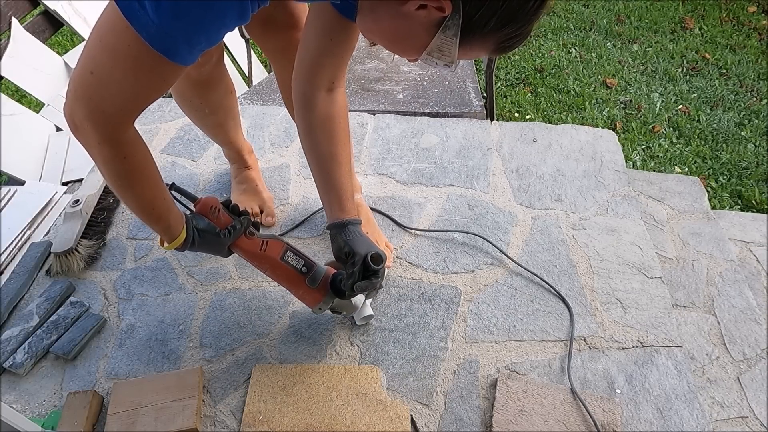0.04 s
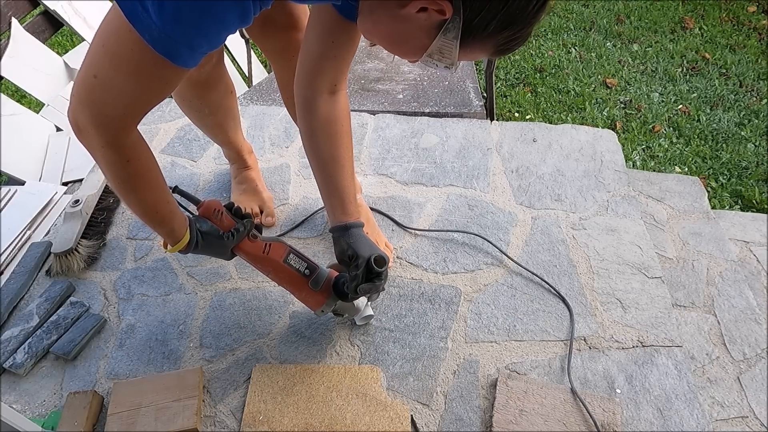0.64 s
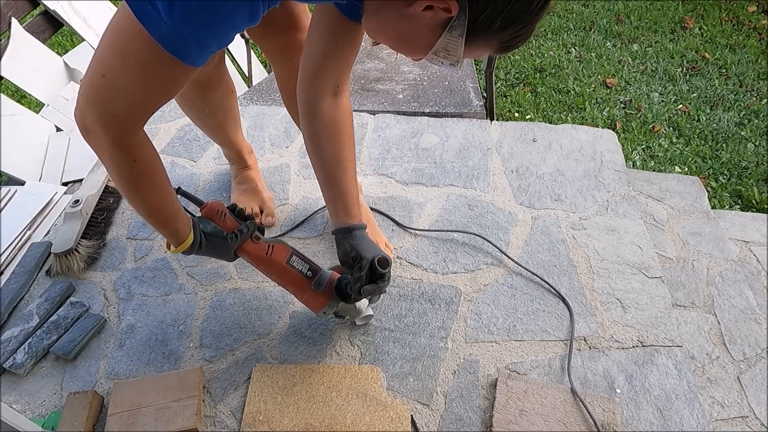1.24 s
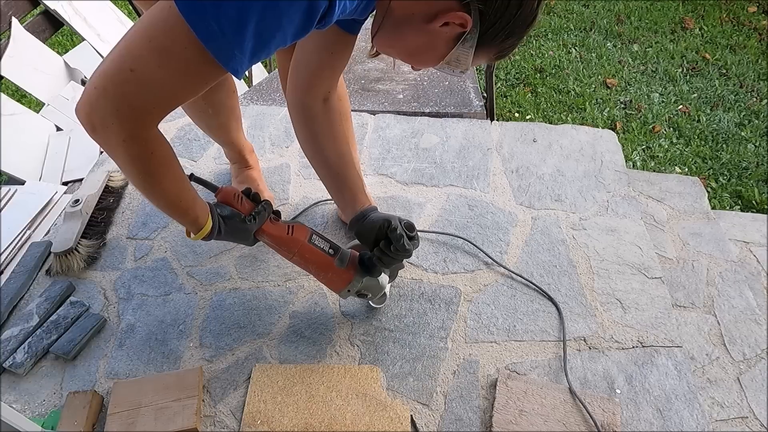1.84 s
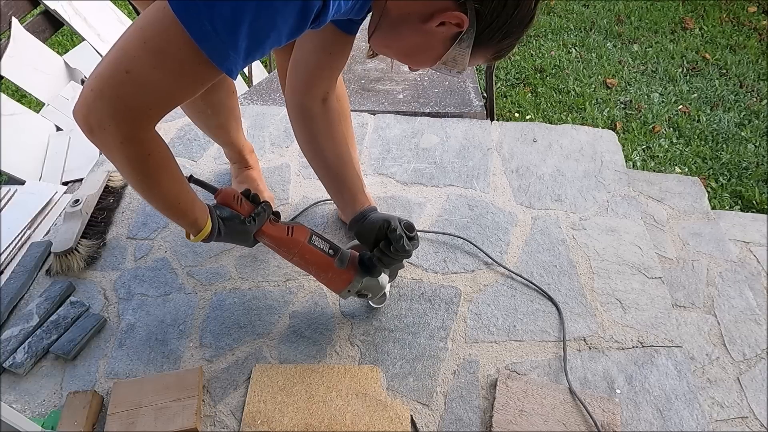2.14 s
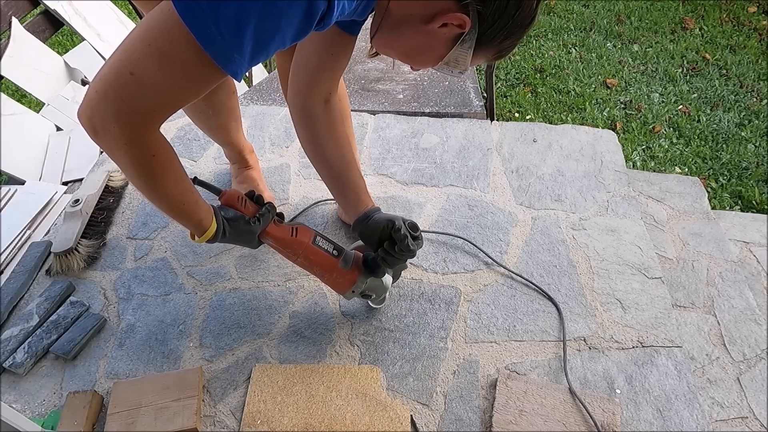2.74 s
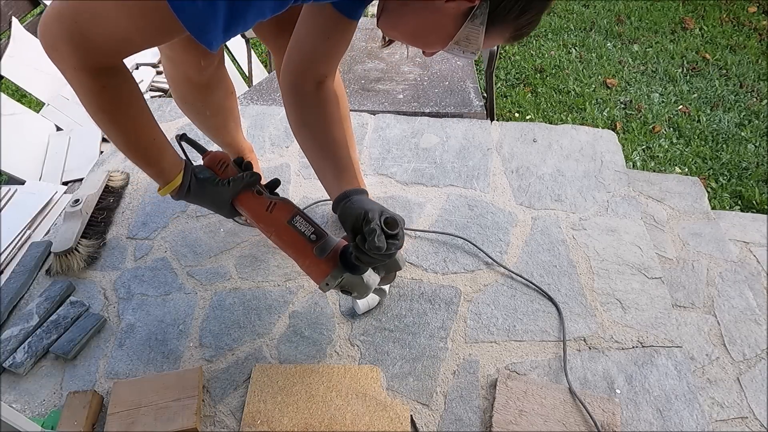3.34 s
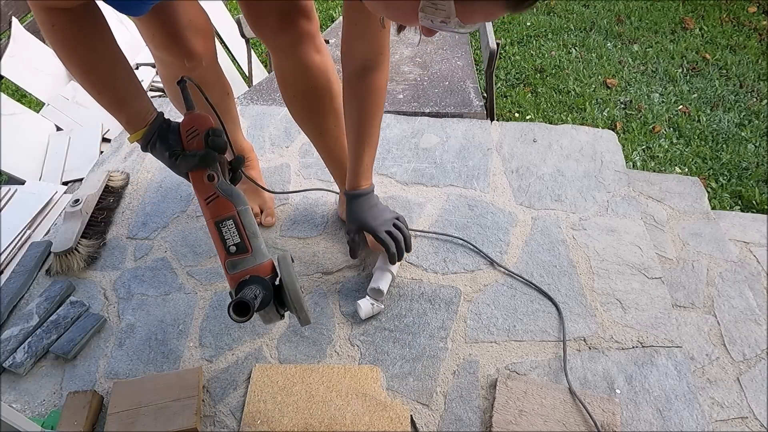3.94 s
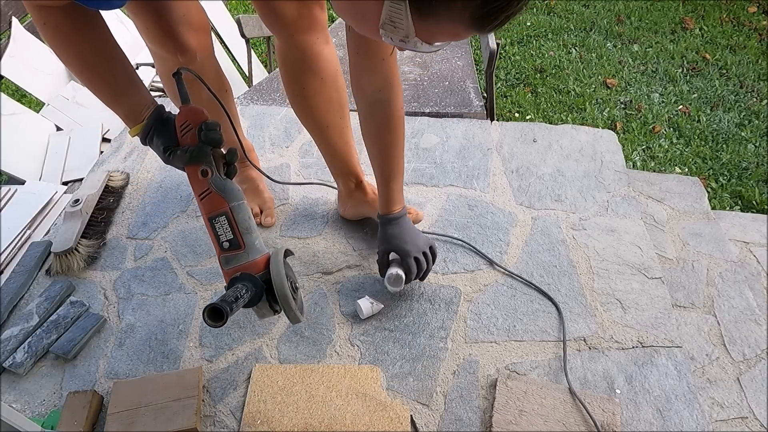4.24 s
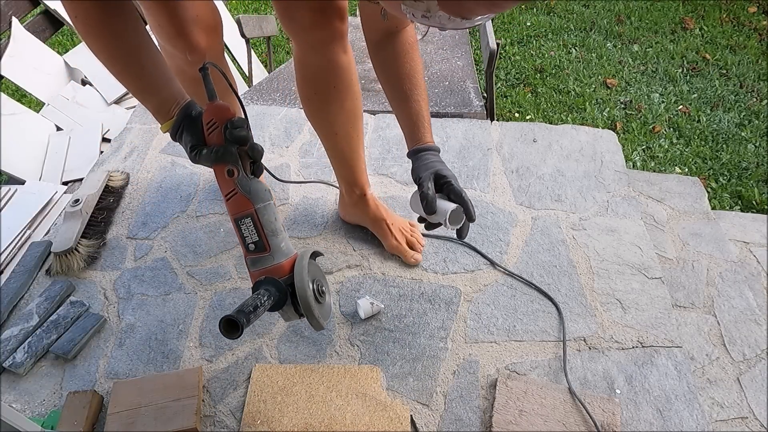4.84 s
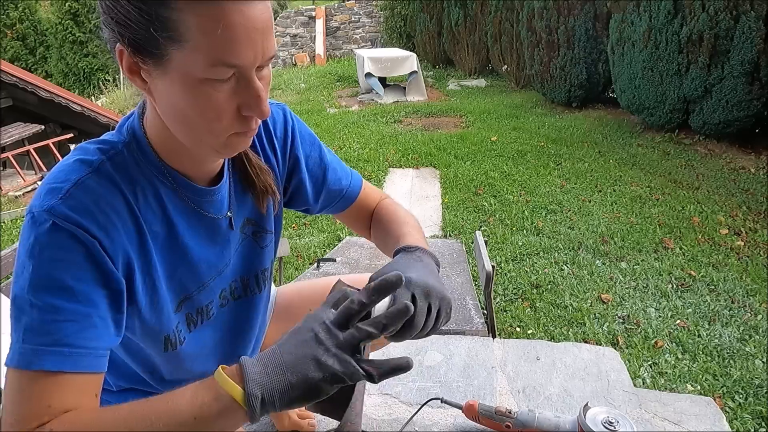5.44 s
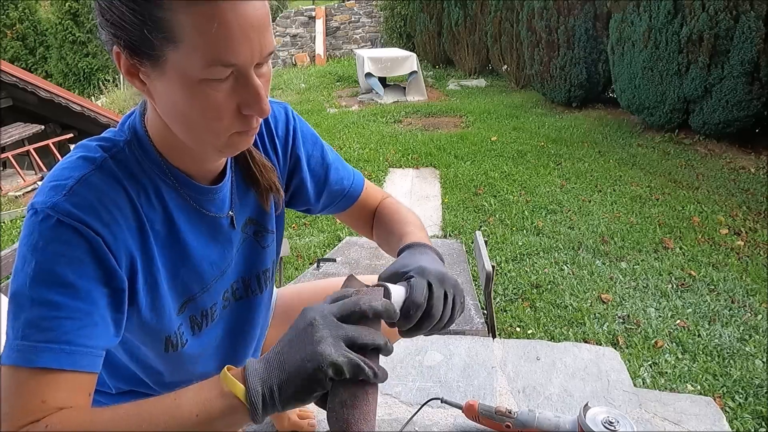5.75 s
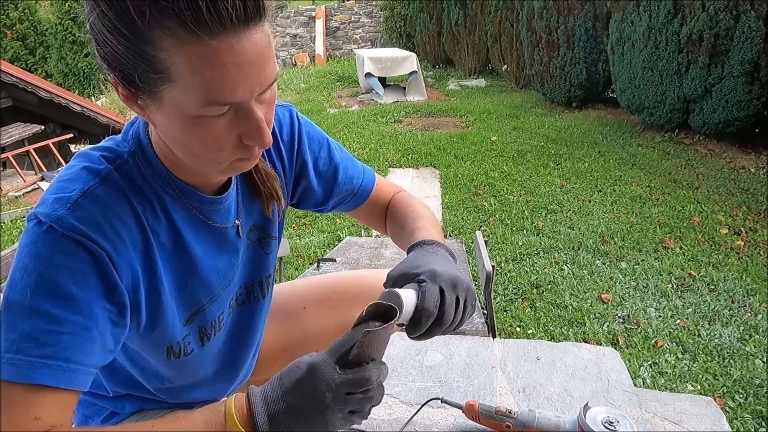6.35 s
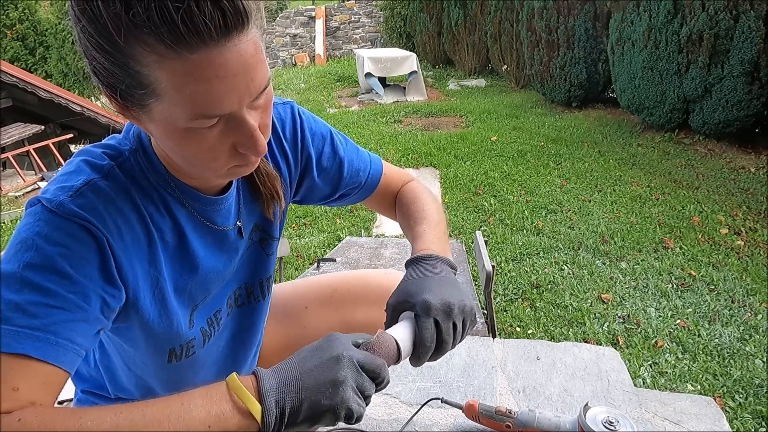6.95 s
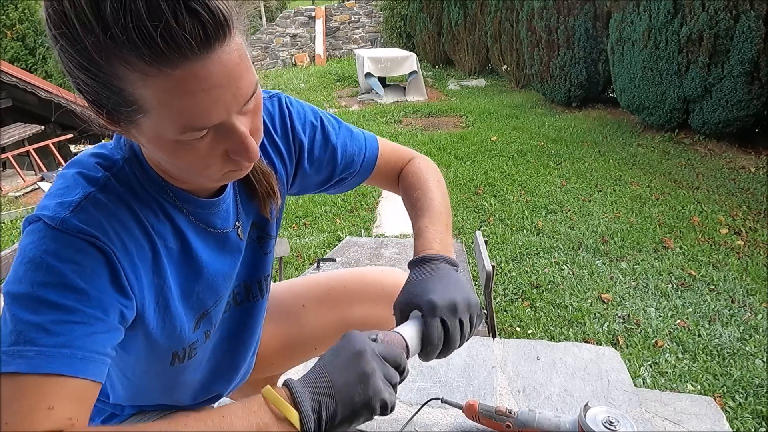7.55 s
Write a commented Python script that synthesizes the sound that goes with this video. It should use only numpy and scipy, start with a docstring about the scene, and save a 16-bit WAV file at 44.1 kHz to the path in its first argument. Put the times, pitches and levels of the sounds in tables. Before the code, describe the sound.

Close by, an angle grinder cuts plastic pipe and coasts down with rattling gears, followed suddenly by soft, scratchy hand sanding.

```python
"""Cutting and sanding a pipe

An angle grinder cuts a small pipe on a stone terrace, close by. Over the rush of fan air and grit,
the disc rings as it bites, is lifted clear and brushes the pipe again. Switched off, the motor falls in
pitch and the loose gears rattle. Then the scene changes suddenly to a quiet garden, where gloved
hands rub the pipe's end with sandpaper: the paper rasps and catches, and the air in the pipe rings."""
import sys
import numpy as np
from scipy import signal
from scipy.fft import rfft, irfft, next_fast_len
from scipy.io import wavfile
from scipy.ndimage import uniform_filter1d

SR = 44100
rng = np.random.default_rng(int(sys.argv[2]) if len(sys.argv) > 2 else 0)


def materialize(psi):
    """Save the field psi as 16-bit PCM at rate SR to the path in sys.argv[1].

    A 1-D psi becomes a single channel; in a 2-D psi each row is a channel.
    """
    bounded = np.clip(np.atleast_2d(psi).T, -1, 1)
    quanta = np.round(bounded * 32767).astype(np.int16)
    wavfile.write(sys.argv[1], SR, quanta)


N = 334719
TIME = np.arange(N) / SR
FFT_SIZE = next_fast_len(N, real=True)
HZ = np.fft.rfftfreq(FFT_SIZE, 1 / SR)

LIFT_S = 1.794  # the disc is lifted clear of the pipe
OFF_S, SANDING_S = 3.31, 5.495  # switch-off, sanding begins
GEAR_RATIO = 34 / 9  # motor turns for one turn of the disc

# Disc speed under power; the load slows it (time [s], speed [turns/s])
DISC_SPEED = [(0, 151.44), (0.55, 150.52), (0.9, 148.92), (1.45, 147.04), (1.68, 147.5), (1.97, 152.58),
              (2.55, 157.5), (2.98, 155), (3.31, 156.75)]
# The disc touches the pipe (start [s], end [s], contact level [dB], hiss of flying grit [dB])
BITES = [(0, .28, 0.5, -39.5), (0.3, 1.737, -1, -50.5), (1.93, 1.982, -1, -41.5), (2.42, 2.46, 0, -42.5),
         (2.516, 2.874, -0.5, -46.5), (2.898, 2.97, 1, -39)]
# Pitches at which disc and guard like to ring (pitch [Hz], width [Hz], level [dB])
DISC_RESONANCES = [(906, 48, -43), (1100, 56, -41), (1780, 110, -38), (2800, 200, -42), (3570, 200, -40),
                   (4920, 260, -30), (4650, 100, -38), (5580, 150, -41), (5850, 160, -36), (6780, 120, -45),
                   (7240, 150, -39), (7520, 120, -51), (8130, 120, -52), (8450, 120, -51), (9080, 220, -50),
                   (10450, 150, -50), (14000, 200, -54)]
# The disc's harmonics (multiples of its speed) between those resonances (pitch [Hz], level [dB])
DISC_BASE = [(150, -58.5), (450, -60.5), (750, -46), (2400, -59), (4000, -41.5), (5500, -46), (6800, -48),
             (8000, -56), (10500, -67.5), (13000, -56), (15000, -75)]
# The disc squeals on one harmonic (peak time [s], length [s], multiple of disc speed, level [dB])
SQUEALS = [(.03, 0.17, 32, -25), (.03, .1, 51, -33), (.04, .2, 12, -39), (0.046, 0.093, 45, -30),
           (.08, 0.25, 33, -27), (.1, 0.22, 54, -48), (.15, 0.28, 57, -41), (.2, 0.25, 61, -36),
           (.22, 0.11, 62, -45), (.25, 0.22, 48, -32.5), (.26, 0.14, 45, -35), (.3, 0.24, 37, -32),
           (.3, 0.43, 6, -41.5), (.33, 0.14, 32, -28), (.15, 0.25, 29, -37), (.15, 0.29, 36, -35),
           (.4, .25, 33, -43), (.45, .2, 54, -50), (.55, .25, 50, -59), (.85, 0.17, 34, -33),
           (1.15, .1, 61, -45), (.45, .3, 39, -38), (.58, .15, 38, -31), (.66, 0.31, 32, -32.5),
           (.68, 0.34, 33, -31.5), (.68, 0.17, 45, -38.5), (.71, 0.14, 48, -35), (0.717, 0.16, 39, -28.5),
           (.72, 0.26, 70, -44.5), (.75, 0.77, 24, -36.5), (.8, 0.56, 20, -40), (.82, .15, 94, -42),
           (.85, 0.15, 8, -34.5), (.88, 0.2, 9, -38.5), (0.962, 0.12, 32, -27.5), (0.974, 0.29, 12, -35),
           (.99, .09, 49, -35.5), (1.0, .09, 40, -29.5), (1.0, .12, 92, -47), (1.067, .1, 34, -38),
           (1.07, 0.25, 38, -36), (1.094, 0.081, 33, -28.5), (1.15, 0.17, 57, -47.5),
           (1.15, 0.23, 49, -35.5), (1.22, .14, 40, -35.5), (1.17, 0.21, 32, -28.5),
           (1.24, 0.25, 19, -31.5), (1.32, 0.19, 33, -28.5), (1.32, .2, 34, -36), (1.35, 0.26, 8, -36),
           (1.35, .14, 18, -35), (1.38, 0.14, 40, -30), (1.4, 0.3, 32, -35), (1.443, 0.26, 49, -33.5),
           (1.57, 0.24, 12, -42), (1.58, 0.17, 18, -33), (1.574, 0.068, 40, -30), (2.898, 0.16, 35, -32.5),
           (2.946, .1, 33, -39)]
# Quick tremble of the harmonics, roughest at the top (pitch [Hz], share of the level [0-1])
TREMBLE = [(5000, .2), (7000, .4), (14000, .55)]

# Tone of the rush deep in the cut, running free, coasting and at its slowest
# (frequency [Hz], level [dB per Hz])
RUSH_BITING = [(35, -59), (60, -25), (480, -14), (564, -4), (679, -8.5), (875, -4.5), (1420, -5),
               (2310, -1.5), (4210, -7), (4950, 2), (5330, -5.5), (5700, -2), (6150, -9), (6700, -11.5),
               (7330, -13.5), (7800, -19), (9000, -31.5), (9900, -30.5), (11400, -32.5), (12800, -30),
               (14000, -36), (15000, -48)]
RUSH_FREE = [(35, -63), (60, -29.5), (317, -16.5), (418, -20), (591, -8), (648, -11.5), (762, -7.5),
             (855, -7), (2360, 0), (2780, -3.5), (4950, -3), (6380, -6.5), (8420, -14.5), (11900, -21),
             (15000, -46)]
RUSH_COASTING = [(40, -55), (95, -66), (150, -18), (260, -20), (430, -14), (680, -8), (880, -10),
                 (1150, -2.5), (1500, -7.5), (2050, 0.5), (3700, -2.5), (4900, -1), (5800, -8), (6600, -6),
                 (7700, -10), (8600, -17.5), (12200, -26), (14000, -41), (15000, -51)]
RUSH_SLOW = [(40, -53.5), (95, -42), (150, -20.5), (400, -15), (680, -5), (1500, -6.5), (2300, 3),
             (3500, -2), (4400, 4), (5400, -3), (7300, -9.5), (8600, -23.5), (12500, -32), (15000, -51)]
# The blend of those four tones (time [s], stage [0 biting, 1 free, 2 coasting, 3 slowest])
RUSH_STAGE = [(0, 0), (1.74, .12), (1.81, 1), (3.5, 1), (3.9, 2), (4.7, 2.1), (5.15, 3)]
# Resonances of the housing, and those the knocking gear head adds (pitch [Hz], width [Hz], lift [dB])
HOUSING_RESONANCES = [(330, 70, 2), (910, 90, 2), (1780, 130, 2), (2330, 250, 1.5), (3050, 200, 1.5),
                      (3600, 220, 2), (4150, 200, 1.5), (6350, 400, 1.5)]
GEAR_HEAD_RESONANCES = [(3120, 170, 1.5), (3400, 300, 0), (4050, 420, 3), (4660, 230, -1)]
# How much of the rush comes in knocks of the loose gears (time [s], share [0-1])
KNOCK_SHARE = [(0, 0.38), (3.3, 0), (3.8, 0.76), (4.6, 0.52), (5.1, 0.79), (5.5, 0.58)]
# The knocks sound mainly in the upper middle range (frequency [Hz], depth [0-1])
KNOCK_BAND = [(700, 0.3), (2000, 0.8), (6000, 1), (9000, 0.2)]
# At low speed the hardest knocks stand apart as clacks (time [s], relative level [dB])
CLACKS = [(5.078, 0.5), (5.089, 1.5), (5.101, 1), (5.113, -1), (5.124, 2), (5.158, 3.5), (5.176, 4.5),
          (5.184, 4), (5.201, -1), (5.211, 4), (5.219, 4), (5.226, -1), (5.238, 4), (5.2533, 4),
          (5.2714, 1), (5.3057, 4), (5.33, 1.5), (5.340, 1.5), (5.352, 3), (5.369, 0), (5.384, 3.5),
          (5.397, 5.5), (5.413, 1), (5.424, 3.5), (5.4433, 1.5), (5.471, -0.5), (5.481, -1.5)]

# The steel guard's two close resonances (pitch [Hz], width [Hz], relative level [dB])
GUARD_RESONANCES = [(4943, 160, 0), (5105, 150, -2)]
# The guard chatters loudly (time [s], length [s], pitch [Hz], bend [Hz/s], level [dB])
CHATTERS = [(3.365, .022, 5100, -3000, -26.5), (3.473, 0.046, 5100, -1800, -27), (3.44, .05, 3620, 0, -29),
            (3.72, .14, 5060, 1100, -26), (3.68, 0.055, 3800, -500, -30.5), (3.81, .06, 3740, 601, -32),
            (4.4, 0.032, 5020, 0, -29), (4.68, 0.18, 5300, 0, -30.5), (5.43, .06, 5000, 0, -25)]
# The hum swells as it passes through these bands of the housing (pitch [Hz], width [Hz], level [dB])
HUM_BANDS = [(320.7, 16, -35), (348.4, 55, -35), (408.5, 14, -38.5), (452, 55, -41.5), (548, 64, -40),
             (599.6, 34, -42.5)]
# Motor whines; multiple 9 is the gear teeth meeting
# (multiple of motor speed, level under power [dB], level coasting [dB])
WHINES = [(3, -46.5, -47.5), (4, -39.5, -51.5), (7, -53, -54.5), (8, -41, -49), (9, -55, -39.5),
          (10, -60, -50), (12, -43, -61)]
# Bands in which the gear head lifts a whine (pitch [Hz], width [Hz], lift [dB])
WHINE_BANDS = [(1180, 160, 6.5), (3150, 280, 0)]
# A falling whine sings out in the gear head (time [s], length [s], multiple of motor speed, level [dB])
WHINE_SWELLS = [(3.85, .06, 9, -33), (4.21, .07, 9, -29.5), (4.35, .06, 9, -33.5), (4.33, .06, 10, -35),
                (4.8, 0.11, 8, -35.5), (5.15, 0.17, 9, -36.5), (5.27, .07, 7, -33.5), (5.45, 0.083, 8, -34)]

# Sandpaper strokes; the pipe answers with a hollow note when the hand uncovers it
# (peak time [s], level [dB], rise [s], fall [s], relative hollow note [dB])
STROKES = [(5.5, -46.5, 0.023, 0.17, -9.5), (5.82, -53, 0.04, 0.062, -6), (5.99, -45, 0.031, 0.056, -7),
           (6.07, -49, .025, 0.1, -7), (6.33, -61.5, 0.035, 0.048, 7.5), (6.62, -57.5, 0.036, 0.11, -4),
           (6.74, -64, .03, .05, -2), (6.82, -37, 0.03, 0.15, -8), (6.93, -46, 0.018, 0.046, -1),
           (7.01, -39, 0.024, 0.022, -6), (7.115, -41.5, 0.009, 0.039, -7), (7.18, -43, 0.011, 0.023, -10),
           (7.255, -39.5, 0.073, 0.06, -11), (7.35, -33, 0.077, 0.034, -5), (7.54, -31, 0.064, 0.41, -8)]
# Tone of firm rubbing, catching paper, glove bumps and light rubbing (frequency [Hz], level [dB per Hz])
FIRM_TONE = [(59, -75), (100, -47), (222, -22), (310, -28), (434, -15.5), (703, -4), (1020, 4.5),
             (1160, -11), (1350, -4), (1900, -0.5), (2400, -5.5), (3250, -10.5), (6760, -20.5),
             (15000, -47)]
CATCH_TONE = [(100, -49), (250, -21), (600, -10), (950, -1.5), (1350, 7), (1800, -8.5), (2700, -16),
              (3300, -13), (4200, -12.5), (6000, -18.5), (8500, -29.5), (12000, -37), (15000, -45)]
BUMP_TONE = [(40, -31), (100, -12), (200, 5), (370, 6), (600, 5), (1200, -47), (4000, -70)]
LIGHT_TONE = [(100, -10.5), (300, 6.5), (650, -0.5), (1200, 7.5), (1800, 3.0), (2600, 1), (4800, -5.0),
              (7500, -18.5), (9500, -27.5), (13000, -30), (15000, -33)]
# The rim catches on the paper (time [s], level [dB], length [s], relative rasp [dB], relative ring [dB])
CATCHES = [(5.562, -42.5, 0.014, -23, -7), (5.627, -45, 0.0083, -23, -3), (5.785, -41, 0.0066, -20, -4),
           (5.931, -46, 0.0018, -4, -15), (5.962, -38.5, 0.0043, -20, 5.5), (6.3, -38, 0.004, -14, -6),
           (6.451, -57, .003, -1, -15), (6.499, -51, 0.0022, -1, -15), (6.6, -42, 0.0075, -11, -13),
           (6.687, -50.5, .011, -4, -3), (6.786, -33, 0.0047, -6, 2), (6.793, -32.5, 0.006, 1, -3),
           (6.8, -33, 0.0034, 0, -8), (6.833, -25.5, 0.013, 0, -12), (6.902, -34, 0.0067, -0.5, 0),
           (7.091, -35.5, 0.007, -20, 2), (7.128, -39, .004, -15, -12), (7.1525, -23.5, 0.0068, -15, -7),
           (7.177, -31, 0.0044, -15, -5), (7.192, -25, 0.012, -13, -14), (7.226, -27, 0.007, -16, -9),
           (7.309, -30, .003, -10, -6), (7.321, -33, .002, 0, -10), (7.331, -33, .002, -2, -8),
           (7.343, -32, 0.0016, 3, -10), (7.349, -36, .002, 0, -10), (7.362, -33, 0.0024, -8, 1),
           (7.454, -33, 0.004, -18, -7), (7.461, -34, .003, -16, -12), (7.523, -34, 0.0018, 12, -14)]
# Gloves bump the pipe (time [s], level [dB])
BUMPS = [(5.785, -53), (6.483, -61), (6.687, -54), (6.788, -39), (6.83, -33.5), (6.902, -44), (7.091, -50)]
# The lowest note of the air in the pipe shifts as the hand covers its end (time [s], pitch [Hz])
PIPE_NOTE = [(5.55, 1420), (5.8, 1174), (6.07, 1230), (6.3, 1300), (6.62, 1320), (6.85, 1380), (7.54, 1340)]
# Higher resonances of that air (pitch [Hz], width [Hz], gain [dB])
PIPE_RESONANCES = [(2490, 280, -18), (4000, 300, 8.5)]

# Gusts of air hit the microphone (time [s], length [s], level [dB])
GUSTS = [(.13, 0.15, -47), (1.79, 0.037, -67), (2.94, 0.073, -59)]
# Tone of the still garden and of the buffeting air (frequency [Hz], level [dB per Hz])
GARDEN_TONE = [(30, -3.5), (95, -28), (145, 10), (260, 7.5), (450, -16), (800, -22), (1400, -5), (4000, -6),
               (8000, -19.5), (15000, -34)]
BUFFET_TONE = [(15, -4.5), (50, -3.5), (150, -2.5), (300, -12), (1000, -79.5)]
# Stereo width, narrow in the first cut and the light rubbing (start [s], side gain [dB])
STEREO_WIDTH = [(0, -7.5), (1.79, 1), (5.5, -18), (6.78, -4)]
# How alike left and right are (frequency [Hz], likeness [1 or more means alike])
LIKENESS = [(60, 1), (130, 0.9), (300, 0.85), (1400, 0.93), (3000, 0.82), (6000, 1), (9000, 8), (14000, 5)]
# Balance between the sides (frequency [Hz], left minus right [dB])
BALANCE = [(100, -1.9), (400, 0.5), (5000, -0.5), (8000, 1.5), (11000, -0.5), (13500, -4)]
# While the sound is narrow, the top treble still spreads sideways (frequency [Hz], side gain [dB])
TOP_SPREAD = [(5000, -44.5), (8000, -20), (10500, -5), (13000, 9.5)]


def disc(turns, wander_db=2.0, level_db=-1, ring_db=-1.0, squeal_db=1, brush_db_per_harmonic=-0.03):
    """The disc strikes the pipe alike on every turn; its harmonics swell as they cross a resonance."""
    n = int(3.2 * SR)  # the last bite has faded by then
    t = TIME[:n:200]
    turns_per_s, pressed, out = speed(t), contact(t), np.zeros(n)
    first_harmonic, wave = np.exp(2j * np.pi * turns[:n]), 1
    for k in range(1, 99):
        hz, wave = k * turns_per_s, wave * first_harmonic
        power = gain_of(at_hz(DISC_BASE, hz)) ** 2
        power += sum((gain_of(db + ring_db) * peak(hz, f, w)) ** 2 for f, w, db in DISC_RESONANCES)
        # the contact point creeps along the slot, so each harmonic grows and fades
        slow, quick = rng.standard_normal((2, len(t)))
        slow = unit_level(uniform_filter1d(uniform_filter1d(slow, size=50), size=30))
        level = np.sqrt(power) * pressed * gain_of(wander_db * slow + level_db)
        # once lifted clear, light brushes stir the high harmonics less
        level *= gain_of(brush_db_per_harmonic * k * (t > LIFT_S))
        for s, length, multiple, db in SQUEALS:
            if multiple == k:
                level = np.maximum(level, gain_of(db + squeal_db) * swell(s, length, t) ** 2)
        level *= 1 + at_hz(TREMBLE, hz) * unit_level(uniform_filter1d(quick, size=3))
        # harmonics near the guard's main ring swing in step, so the screech throbs once a turn
        lag = rng.random() * (abs(k * turns_per_s[0] - GUARD_RESONANCES[0][0]) > 330)
        out += np.interp(TIME[:n], t, level) * (wave * np.exp(2j * np.pi * lag)).real
    return np.sqrt(2) * np.pad(out, (0, N - n))


def contact(t=TIME, column=2, press_s=0.0084, release_s=0.062):
    """Each bite presses in, holds and lets go. Column 2 gives the contact's gain, 3 the grit's."""
    bites = []
    for row in BITES:
        before, after = np.maximum(row[0] - t, 0), np.maximum(t - row[1], 0)
        bites.append(gain_of(row[column]) * np.exp(-before / press_s - after / release_s))
    return np.max(bites, axis=0)


def speed(t=TIME):
    """Turns of the disc per second."""
    return over_time(DISC_SPEED, t) / 2 ** slowing(t)


def slowing(t=TIME, coast_s=3.37, drag_share=.0142, drag_s=.35):
    """Octaves (halvings) of speed lost since the switch-off; air drag takes a little extra at first."""
    since = np.maximum(t - OFF_S, 0)
    return (since / coast_s + drag_share * (1 - np.exp(-since / drag_s))) / np.log(2)


def rush(knocks, flutter_db=.5, patchy_db=1.6):
    """Fan air, grit and gear knocks make noise in the housing; its tone follows load and speed."""
    frames = dict(nperseg=1024, noverlap=768)
    hz, t, (steady, knocked) = signal.stft(white() * [np.ones(N), knocks], SR, **frames)
    noise = steady + at_hz(KNOCK_BAND, hz)[:, None] * (knocked - steady)
    stage = over_time(RUSH_STAGE, t)
    tone_db = sum(at_hz(tone, hz)[:, None] * np.maximum(1 - abs(stage - k), 0)
                  for k, tone in enumerate((RUSH_BITING, RUSH_FREE, RUSH_COASTING, RUSH_SLOW)))
    tone_db += lift_db(HOUSING_RESONANCES, hz)[:, None]
    tone_db += lift_db(GEAR_HEAD_RESONANCES, hz)[:, None] * np.clip(stage - 1, 0, 1)
    # narrow bands come and go as the tool moves over the stone
    patches = uniform_filter1d(rng.standard_normal(noise.shape), size=4, axis=0)
    tone_db += patchy_db * unit_level(uniform_filter1d(patches, size=18, axis=1))
    sound = signal.istft(noise * rush_levels(gain_of(tone_db), hz, t), **frames)[1][:N]
    return sound * gain_of(flutter_db * drift(30))


def rush_levels(tone, hz, t, free_db=-21.5, deep_db=-5.5, hiss_db=-43):
    """The rush grows until the disc is lifted and fades as it coasts; flying grit adds hiss on top."""
    cut_time_left = np.maximum(1 - t / LIFT_S, 0)  # as a share, from 1 down to 0
    body_level = gain_of(free_db + deep_db * np.sqrt(cut_time_left) - 2.5 * slowing(t))
    hiss = gain_of(hiss_db - 0.5 * (t < LIFT_S) - 9 * slowing(t) ** 2)
    top_level = np.hypot(hiss, contact(t, column=3))
    body, top = (hz > 1200) & (hz < 4300), (hz > 8500) & (hz < 13000)
    body_gain = body_level / np.sqrt((tone[body] ** 2).sum(0) / len(hz))
    top_gain = top_level / np.sqrt((tone[top] ** 2).sum(0) / len(hz))
    high = np.interp(hz, [7000, 8800], [0, 1])[:, None]
    return tone * body_gain ** (1 - high) * top_gain ** high


def gear_rattle(turns, skip_below=0.12, jitter_turns=.07, spread_db=0.9, between_db=-12, ring_s=.0036):
    """Loose gear teeth knock about once a turn, at last in separate clacks: gives a loudness pattern."""
    turn = np.arange(int(turns[-1]))
    late, size, luck = rng.standard_normal((1500, 3))[:len(turn)].T
    at = np.interp(turn + jitter_turns * late, turns, np.arange(N)).astype(int)
    knock_db = spread_db * size + between_db * (TIME[at] > CLACKS[0][0])
    knocks = np.zeros(N)
    knocks[at] = gain_of(knock_db) ** 2 * (abs(luck) > skip_below)
    for s, db in CLACKS:
        knocks[round(s * SR)] += gain_of(db) ** 2
    t = TIME[:SR // 30]
    power = np.maximum(signal.oaconvolve(knocks, t * np.exp(-2 * t / ring_s))[:N], 0)
    power /= uniform_filter1d(power, SR // 8) + 1e-12
    share = over_time(KNOCK_SHARE)
    return np.sqrt(1 - share + share * power)


def guard(turns, knocks, cut_db=-35.5, coast_db=-31.5, throb=0.35, brush_db=-9, chatter_width_hz=130):
    """The steel guard rings and chatters, shaken once a turn in the cut and by the gears afterwards."""
    cutting = gain_of(cut_db + brush_db * (TIME > LIFT_S)) * contact()
    cutting *= 1 + throb * np.cos(2 * np.pi * turns)
    coasting = gain_of(coast_db) * np.clip((TIME - OFF_S) * 10, 0, 1)
    ring = sum(gain_of(db) * resonate_twice(white() * knocks, hz, width)
               for hz, width, db in GUARD_RESONANCES)
    out = (cutting + coasting) * unit_level(ring)
    shaking = white() * knocks
    for s, length, hz, bend, db in CHATTERS:
        near = abs(TIME - s) < 2 * length
        t = TIME[near]
        chatter = glide(shaking[near], hz + bend * (t - s), chatter_width_hz)
        out[near] += gain_of(db) * swell(s, length, t) * unit_level(chatter)
    return out


def motor(turns, rough=0.13, coast_rough=0.06, wobble=0.023, labour_db=4.5, labour_s=.08, bars_db=-55):
    """The motor hums at its own speed, roughly under power and more cleanly when coasting."""
    shaft = 2 * np.pi * GEAR_RATIO * turns + wobble * drift(25)
    coasting = np.clip(TIME - OFF_S, 0, 1)
    unrest = rough + (coast_rough - rough) * coasting
    hum = np.sin(shaft) * (1 + unrest * drift(35)) + np.cos(shaft) * unrest * drift(35)
    hum /= np.sqrt(1 + 2 * unrest ** 2)
    hz = GEAR_RATIO * speed()
    hum *= np.sqrt(sum((gain_of(db) / (1 + (2 * (hz - f) / w) ** 4)) ** 2 for f, w, db in HUM_BANDS))
    # the motor labours just before the disc is lifted
    hum *= gain_of(labour_db * swell(LIFT_S - labour_s / 2, labour_s))
    whines = sum(whine(k, shaft, on_db + (off_db - on_db) * coasting) for k, on_db, off_db in WHINES)
    # its 24 contact bars whistle faintly once it has slowed
    bars_level = gain_of(bars_db + np.interp(TIME, [4.2, 4.7], [-22, 0])) * (1 + .3 * drift(30))
    return np.sqrt(2) * (hum + whines + bars_level * np.sin(24 * shaft))


def whine(multiple, shaft, level_db, rough=0.35):
    """One multiple of the motor speed; it sings out where the gear head rings along."""
    level = gain_of(level_db + lift_db(WHINE_BANDS, multiple * GEAR_RATIO * speed()))
    singing = swells([(s, length, db) for s, length, k, db in WHINE_SWELLS if k == multiple])
    wave = np.sin(multiple * shaft + 2 * np.pi * rng.random())
    return np.hypot(level, singing) * wave * (1 + rough * drift(22))


def sanding(grip, hollow=0.46, rasp_hz=2560, rasp_width_hz=1040):
    """The paper rubs; now and then the rim catches and rings the pipe, or a glove bumps it."""
    scrape, rasp, ring, bump = np.zeros((4, N))
    for s, db, length, rasp_db, ring_db in CATCHES:
        shape = gain_of(db) * burst(length)
        note = np.sqrt(2) * np.sin(2 * np.pi * over_time(PIPE_NOTE, s) * TIME[:len(shape)])
        add(scrape, s, shape)
        add(rasp, s, gain_of(rasp_db) * shape)
        add(ring, s, gain_of(ring_db) * shape * note)
    for s, db in BUMPS:
        add(bump, s, gain_of(db) * burst(length_s=0.019))
    catches = with_tone(scrape * grit(grains_per_s=3200, spread_db=3.5, smooth=0.47), CATCH_TONE)
    pipe_air = sum(gain_of(db) * resonate(catches, hz, width) for hz, width, db in PIPE_RESONANCES)
    rasp *= unit_level(resonate_twice(white(), rasp_hz, rasp_width_hz))
    return rubbing(grip) + catches + hollow * pipe_air + rasp + ring + with_tone(bump * white(), BUMP_TONE)


def rubbing(grip, light_db=-2, light_until_s=7.0, firm_from_s=7.28):
    """A light touch sounds hollow and fizzy, a firm stroke rasps; the pipe adds its lowest note."""
    level, note_level = strokes()
    friction = grip * grit(grains_per_s=1300, spread_db=0.5, smooth=0.83)
    firmness = np.interp(TIME, [light_until_s, firm_from_s], [0, 1])
    light = gain_of(light_db) * with_tone(friction * np.sqrt(1 - firmness), LIGHT_TONE)
    firm = with_tone(friction * np.sqrt(firmness), FIRM_TONE)
    note = glide(grip * white(), over_time(PIPE_NOTE), width_hz=134)
    return level * (light + firm) + note_level * unit_level(note)


def strokes():
    """Each stroke swells and dies away: gives the gain of the friction and of the pipe's note."""
    power, note_power = np.zeros((2, N))
    start = int(SANDING_S * SR)
    t = TIME[start:]
    for s, db, rise_s, fall_s, hollow_db in STROKES:
        rise, fall = swell(s, rise_s, np.minimum(t, s)), np.exp(-np.maximum(t - s, 0) / fall_s)
        stroke = gain_of(db) * rise * fall
        power[start:] += stroke ** 2
        note_power[start:] += (stroke * gain_of(hollow_db)) ** 2
    return np.sqrt(power), np.sqrt(note_power)


def stick_slip(slips_per_s=170, slip_s=0.0048, steady=0.64):
    """The paper grips and lets go: each slip starts at once and dies away."""
    slips = rng.uniform(0.5, 1, N) * (rng.random(N) < slips_per_s / SR)
    power = signal.lfilter([1], [1, -np.exp(-2 / (slip_s * SR))], slips)
    return np.sqrt(steady + (1 - steady) * power / power.mean())


def grit(grains_per_s, spread_db, smooth):
    """Grains of sand snap over an edge, on a bed of finer friction."""
    size = gain_of(spread_db * np.minimum(rng.exponential(1, N), 4)) * rng.choice([-1, 1], N)
    snaps = size * (rng.random(N) < grains_per_s / SR)
    return unit_level(unit_level(snaps) + smooth * white())


def buffet(draught_db=-65, loss_db_per_octave=17):
    """Moving air rumbles on the microphone: the fan's draught and a few gusts."""
    level = gain_of(draught_db - loss_db_per_octave * slowing()) + swells(GUSTS)
    return level * gain_of(2.8 * drift(6)) * with_tone(white(), BUFFET_TONE)


def garden(level_db=-64.5):
    """The faint, gently wavering hush of a still garden."""
    return gain_of(level_db) * with_tone(white(), GARDEN_TONE) * gain_of(1.5 * drift(4.7))


def stereo(centre, side_noise, lag_s=.000014):
    """The noise spreads left and right, narrow at times and wide at others; the top treble stays wide."""
    starts, width_db = np.transpose(STEREO_WIDTH)
    width = uniform_filter1d(gain_of(width_db)[np.searchsorted(starts[1:], TIME)], size=400)
    same = np.clip(at_hz(LIKENESS, HZ), 0, 1)
    side = rfft(side_noise * width, FFT_SIZE) * np.sqrt((1 - same) / (1 + same))
    side -= 1j * np.pi * HZ * lag_s * rfft(centre * width, FFT_SIZE)
    side += 1j * gain_of(at_hz(TOP_SPREAD, HZ)) * rfft(side_noise * np.maximum(1 - width, 0), FFT_SIZE)
    tilt = gain_of(at_hz(BALANCE, HZ) / 2)
    mid = rfft(centre, FFT_SIZE)
    return irfft(np.array([(mid + side) * tilt, (mid - side) / tilt]), FFT_SIZE)[:, :N]


def gain_of(db):
    """Turns decibels into a number to multiply by."""
    return 10 ** (np.asarray(db) / 20)


def unit_level(x):
    """Scales a signal to an average power of 1."""
    return x / np.sqrt(np.mean(x ** 2) + 1e-20)


def over_time(rows, t=TIME):
    """Joins the points of a time table with straight lines."""
    return np.interp(t, *np.transpose(rows))


def at_hz(rows, hz):
    """Joins the points of a frequency table, with octaves evenly spaced."""
    f, value = np.transpose(rows)
    return np.interp(np.log(hz + 1), np.log(f + 1), value)


def white():
    """Plain, even hiss."""
    return rng.standard_normal(N)


def with_tone(x, tone):
    """Gives a sound the tone in a table; plain hiss keeps its power."""
    gain = gain_of(at_hz(tone, HZ))
    return irfft(rfft(x, FFT_SIZE) * gain, FFT_SIZE)[:N] / np.sqrt(np.mean(gain ** 2))


def drift(per_s):
    """A smooth random wander that changes about per_s times a second."""
    f = np.fft.rfftfreq(4096, N / SR / 4096)
    slow = irfft(rfft(rng.standard_normal(4096)) * np.exp(-(f / per_s) ** 2))
    return np.interp(TIME, np.linspace(0, N / SR, len(slow)), unit_level(slow))


def peak(hz, centre_hz, width_hz):
    """The shape of a resonance: 1 at its centre, less to either side."""
    return 1 / (1 + (2 * (hz - centre_hz) / width_hz) ** 2)


def lift_db(resonances, hz):
    """How much a set of resonances lifts each frequency."""
    return sum(db * peak(hz, f, width) for f, width, db in resonances)


def resonate(x, hz, width_hz):
    """Lets through the band around one pitch."""
    return signal.lfilter(*signal.iirpeak(hz, hz / width_hz, SR), x)


def resonate_twice(x, hz, width_hz):
    """The same band with steeper sides."""
    return resonate(resonate(x, hz, width_hz), hz, width_hz)


def glide(x, hz, width_hz):
    """A steep resonance whose pitch follows the curve hz."""
    spin, decay = np.exp(2j * np.pi * np.cumsum(hz) / SR), np.exp(-np.pi * width_hz / SR)
    return (spin * signal.lfilter([(1 - decay) ** 2], [1, -2 * decay, decay * decay], x / spin)).real


def swell(s, length, t=TIME):
    """A smooth rise and fall around time s."""
    return np.exp(-((t - s) / length) ** 2)


def swells(rows):
    """Adds up swells (time [s], length [s], level [dB])."""
    return sum(gain_of(db) * swell(s, length) for s, length, db in rows)


def burst(length_s, rise_share=.12, tail=0.035, tail_s=0.014):
    """The loudness of a catch or bump: a quick rise, a fall and a faint tail."""
    t = TIME[:SR // 6]
    rise = 1 - np.exp(-t / (rise_share * length_s))
    return rise * (swell(0, length_s, t) + tail * np.exp(-t / tail_s))


def add(mix, s, sound):
    """Mixes a sound in at time s."""
    part = mix[round(s * SR):][:len(sound)]
    part += sound[:len(part)]


def scene():
    """First the grinder, then suddenly the sanding."""
    turns = np.cumsum(speed()) / SR
    knocks, grip = gear_rattle(turns), stick_slip()
    grinding = np.clip((SANDING_S - TIME) * SR / 40, 0, 1)  # drops from 1 to 0 in 40 samples

    def noises():
        """Air and grit send different noise in each direction, so each call makes it afresh."""
        hush = garden()
        grinder = rush(knocks) + guard(turns, knocks) + buffet()
        return grinder * grinding + (sanding(grip) + hush) * (1 - grinding)

    centre = noises() + (disc(turns) + motor(turns)) * grinding
    return stereo(centre, side_noise=noises())


def record(dry, edge_hz=15300):
    """Takes away the very highest treble."""
    low_pass = signal.firwin(255, edge_hz, window=("kaiser", 9), fs=SR)
    return signal.oaconvolve(dry, low_pass[None], "same")


dry = scene()
out = record(dry)
materialize(out)
```